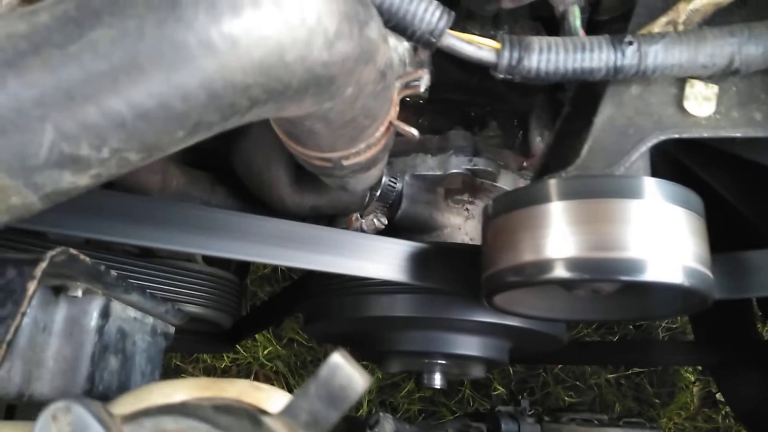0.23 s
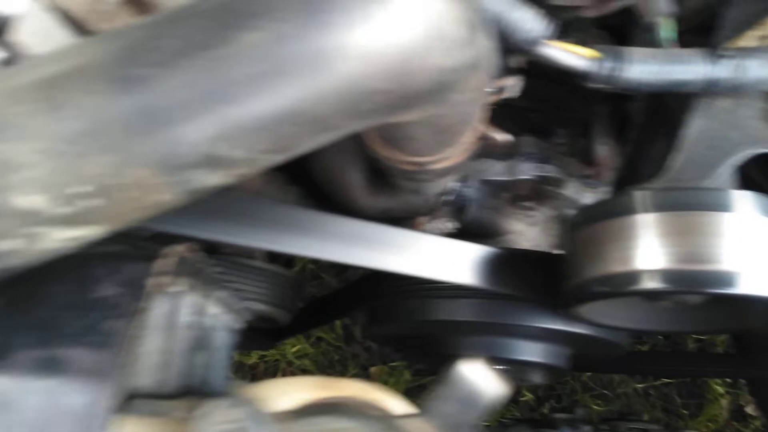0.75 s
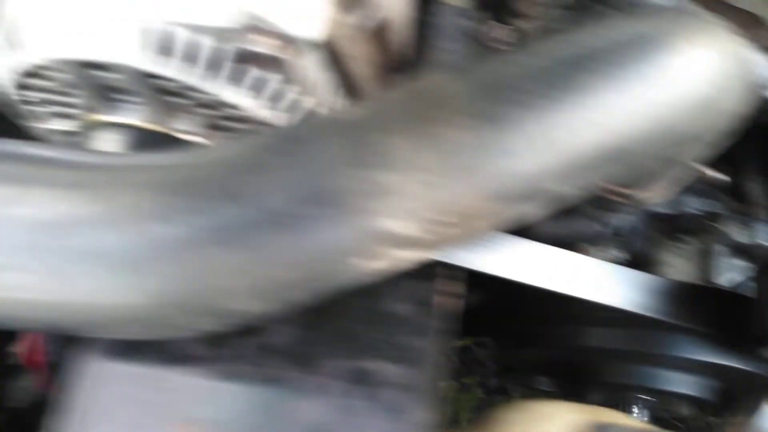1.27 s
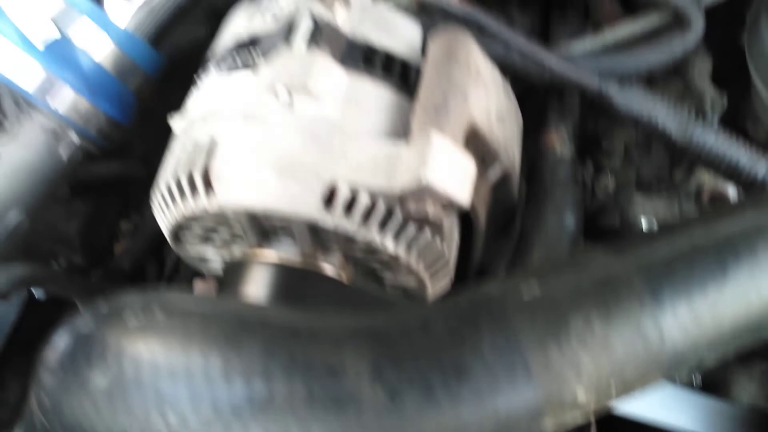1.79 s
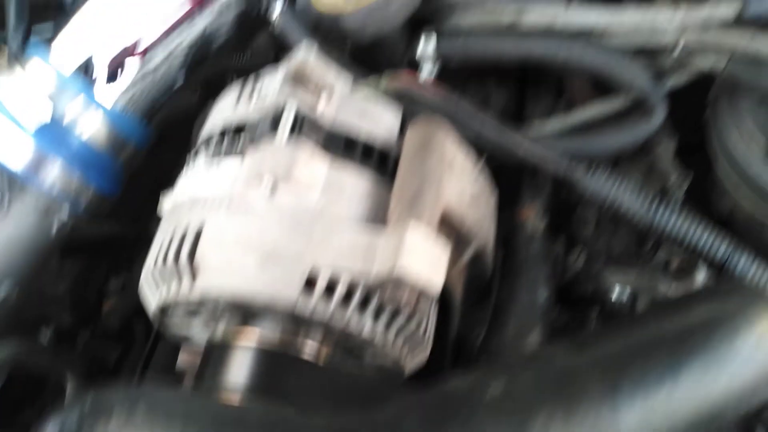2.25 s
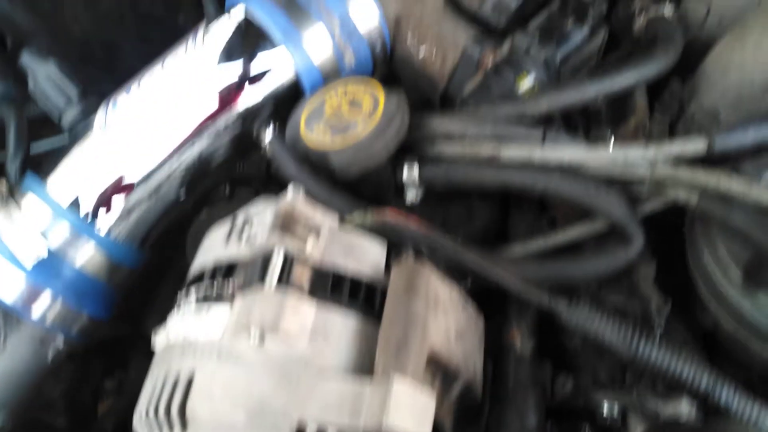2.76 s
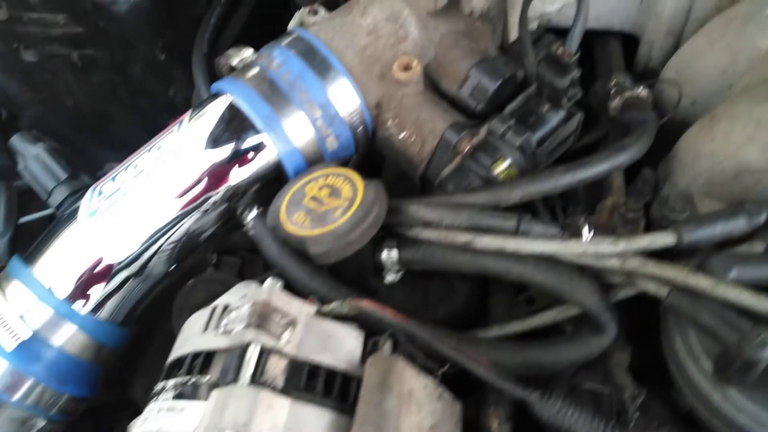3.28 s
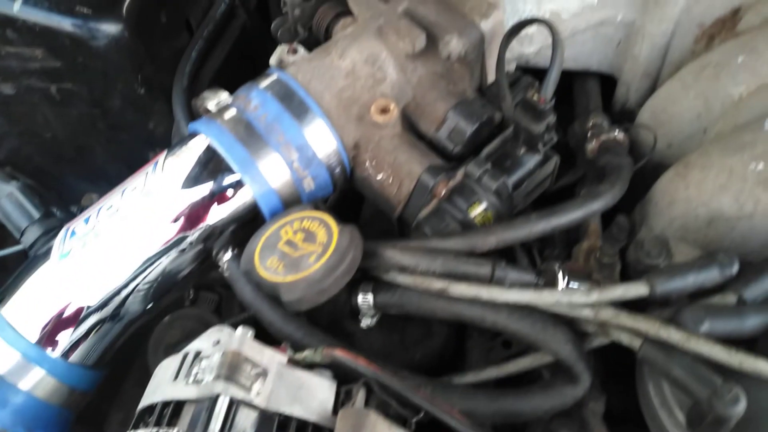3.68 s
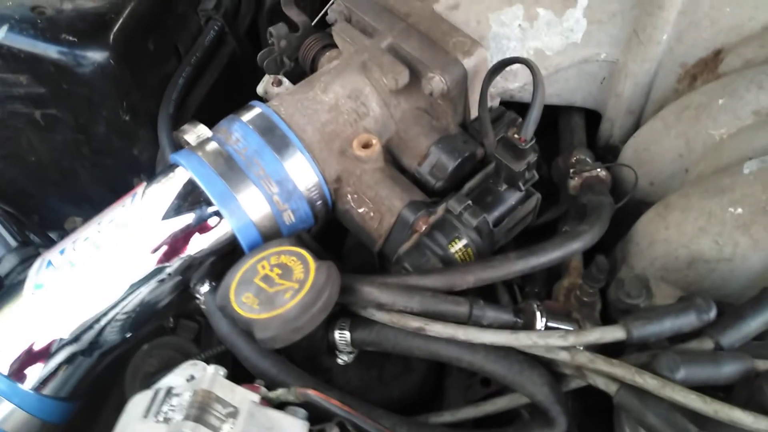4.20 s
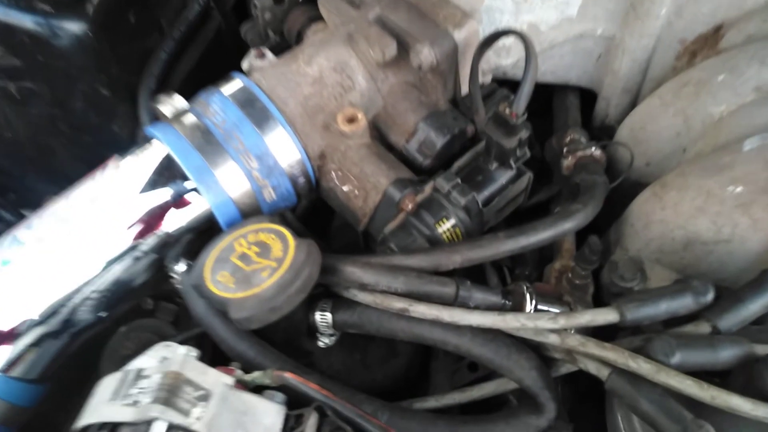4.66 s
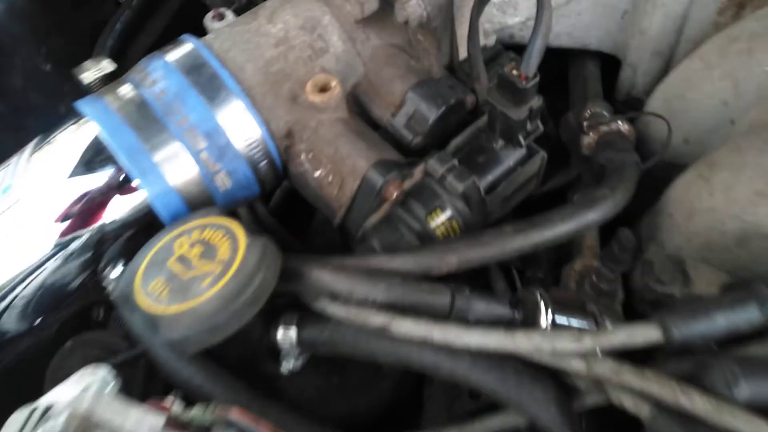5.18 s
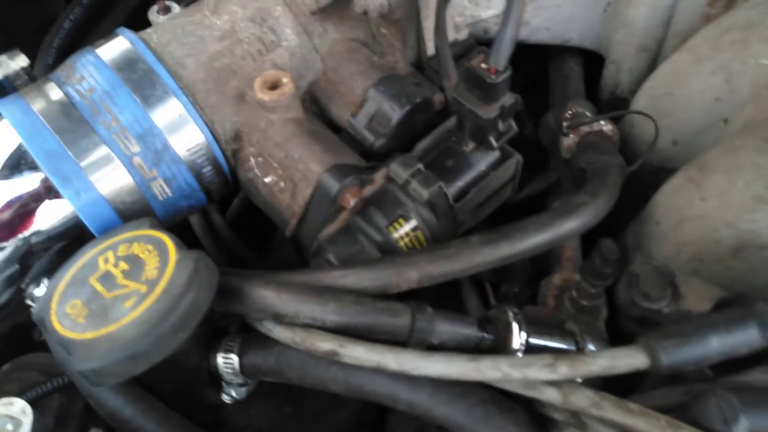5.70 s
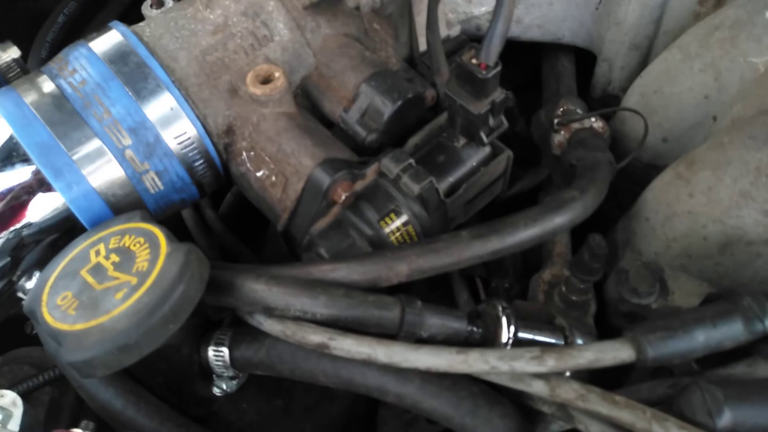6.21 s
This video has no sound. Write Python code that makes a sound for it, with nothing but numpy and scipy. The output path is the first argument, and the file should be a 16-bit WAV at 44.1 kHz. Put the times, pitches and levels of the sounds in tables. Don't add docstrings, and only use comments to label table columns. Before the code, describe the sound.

An eight-cylinder engine idles continuously, heard close in its open bay. Low block rumble and rapid firing knocks sit under belt roar, fan hiss, thin bearing whistles and clattering tappets. A deep intake hum, pulsing about sixteen times a second, swells loudest around one and a half, three and five seconds, then drops back. The handheld microphone moves from pulleys past the alternator to the throttle, where the hiss shifts in colour.

```python
import sys
import numpy as np
from scipy import signal
from scipy.io import wavfile
from scipy.ndimage import uniform_filter1d

SR = 44100
rng = np.random.default_rng(int(sys.argv[2]) if len(sys.argv) > 2 else 0)


def to_wav(sig):
    pcm = np.clip(np.atleast_2d(sig), -1, 1) * 32767
    pcm = np.round(pcm).astype(np.int16)
    wavfile.write(sys.argv[1], SR, pcm.T)


def invert_db(x):
    u = np.asarray(x, float) / 20
    return 10 ** u


N = 284004
T = np.arange(N) / SR

# time_s, crank_turns_per_s
CRANK_SPEED = [(0.0, 16.16), (0.3, 16.4), (0.7, 16.66), (1.1, 15.79), (1.5, 15.96), (1.85, 16.12),
               (2.1, 16.85), (2.45, 16.21), (2.85, 16.27), (3.25, 15.83), (3.6, 16.2), (3.95, 17.04),
               (4.25, 17.0), (4.6, 16.38), (4.95, 15.79), (5.35, 16.48), (5.85, 16.04), (6.44, 16.11)]
# time_s, place (0 pulleys, 1 alternator, 2 throttle)
MIC_PLACE = [
    (0, 0.082),
    (0.85, 0.11),
    (1.45, 0.58),
    (3.0, 0.94),
    (3.7, 2.0),
    (6.44, 2.1),
]


def evened(x):
    return x / np.sqrt(np.mean(x ** 2) + 1e-20)


def curve(rows, t):
    rows = np.array(rows)
    return np.interp(t, rows[:, 0], rows[:, 1])


def read(points, hz):
    f, value = np.transpose(points)
    return np.interp(np.log(hz + 1), np.log(f + 1), value)


def add(mix, s, sound):
    at = round(s * SR) - len(sound) // 2 + np.arange(len(sound))
    inside = (at >= 0) & (at < N)
    mix[at[inside]] += sound[inside]


def resonate(x, hz, width):
    turn = np.exp(2j * np.pi * np.cumsum(hz * np.ones(len(x))) / SR)
    r = np.exp(-np.pi * width / SR)
    return 2 * (turn * signal.lfilter([1 - r], [1, -r], x * turn.conj())).real


def nearness(t, place):
    return np.clip(1 - abs(curve(MIC_PLACE, t) - place), 0, 1)


def level(place_db, share):
    # time_s, closeness_db
    closeness = [
        (0, -1),
        (.3, 0.7),
        (1.6, 0),
        (1.96, 0.96),
        (3.5, -0.8),
        (3.93, 0.83),
        (4.9, -0.5),
        (5.7, 0.56),
        (6.44, -0.6),
    ]
    return invert_db(np.interp(curve(MIC_PLACE, T), np.arange(3), place_db) + share * curve(closeness, T))


def hiss(colours, patchy_db, size):
    hop = size // 4
    frames, hz = N // hop + 5, np.fft.rfftfreq(size, 1 / SR)
    t = np.arange(frames) * hop / SR
    a, b, patches, combs = rng.standard_normal((frames, len(hz), 4)).T
    combs = evened(uniform_filter1d(uniform_filter1d(combs, 2, 0), 70, 1))
    patches = evened(uniform_filter1d(uniform_filter1d(patches, 7, 0), 12, 1))
    gusts = evened(uniform_filter1d(rng.standard_normal(frames), 3))
    if len(colours) > 1:
        shares = [nearness(t, k) for k in range(len(colours))]
    else:
        shares = [np.ones(frames)]
    gain = invert_db(sum(np.outer(read(c, hz), s) for c, s in zip(colours, shares)))
    gain /= np.sqrt((gain ** 2).sum(0))
    z = (a + 1j * b) * gain * invert_db(patchy_db * patches + 1.9 * combs + 0.42 * gusts)
    return evened(signal.istft(z, nperseg=size, noverlap=size - hop)[1][:N])


def beat(turns, depth):
    return evened(1 + depth * np.exp(-(turns % 1) / 0.15))


def gulps(turns):
    # start_s, boom_peak_db
    valve = [(0, -24.5), (.66, -16), (.91, -22), (1.04, -11), (1.4, -4.5), (1.65, -13.5), (1.97, -25),
             (2.89, -5.5), (3.44, -11.5), (3.69, -19.5), (3.81, -26), (4.59, -13), (4.89, -7), (5.27, -16),
             (5.39, -24.5), (5.64, -14), (6.07, -21), (6.38, -16)]
    # time_s, over_valve_db
    odd_gulps = [(.21, 4.5), (.39, -6), (.69, 5.5), (.75, 0), (.88, 4.5), (.94, 2), (1.07, -4), (1.13, 2.5),
                 (1.25, -6), (1.38, 0.5), (1.62, -3), (1.88, 1.5), (2.83, -9), (2.92, -5.5), (3.1, 2.5),
                 (3.47, -1), (3.54, 8.5), (3.66, 3.5), (3.72, -1), (3.78, 6.5), (4.56, -1), (4.61, -3),
                 (4.92, 5), (5.11, 5.5), (5.17, -4.5), (5.24, 2.5), (5.73, -3.5), (5.98, 9.5), (6.1, -16)]
    booms, swell, t = np.zeros(N), np.zeros(N), np.arange(-3500, 3501) / SR
    turn = np.arange(int(turns[-1]) + 1)
    times, odd_even = np.interp(turn, turns, T), (-1.) ** turn
    opened, held_db = np.transpose(valve)
    valve_db = held_db[np.maximum(np.searchsorted(opened, times) - 1, 0)]
    shut = valve_db < -18
    chance = rng.standard_normal((len(turn), 4)) * np.where(shut, 2.1, 1)[:, None]
    gulp_db = 0.88 * chance[:, 0] - 0.5 * odd_even * shut
    for s, db in odd_gulps:
        gulp_db[abs(times - s).argmin()] = db

    stretch = -0.03 * gulp_db + 0.0023 * (valve_db + 6) + 0.13 * odd_even + 0.1 * chance[:, 1]
    halves_s = 0.048 * np.exp(stretch)
    lates_s = 0.0019 + 0.00078 * odd_even + 0.00014 * (valve_db + 13) + 0.0013 * chance[:, 2]
    pitches_hz = 7.38 * curve(CRANK_SPEED, times) + 0.18 * (valve_db + 10) + 1.0 * chance[:, 3]
    builds = 1.386 * np.exp(-0.04 * np.maximum(np.diff(valve_db, prepend=0), 0))

    for s, db, hz, half, late, build in zip(times, valve_db + gulp_db, pitches_hz, halves_s, lates_s, builds):
        length = half * np.where(t < late, build, 0.92)
        shape = invert_db(db) * np.cos(np.pi / 2 * np.clip((t - late) / length, -1, 1)) ** 2
        shape *= 0.9 + 0.24 * np.exp(-((t - late) / 0.011) ** 2)
        add(booms, s, shape * np.cos(2 * np.pi * hz * t))
        add(swell, s, shape)
    return booms, uniform_filter1d(swell, 3500)


def valve_slaps():
    # time_s, peak_db, pitch_hz
    slaps = [(0.2, -51, 190), (0.689, -31, 218), (0.882, -31, 201), (1.07, -30, 198), (1.899, -33, 190),
             (2.937, -21, 186), (3.1, -25.5, 200), (3.543, -20, 192), (4.918, -26, 196), (5.11, -22, 200),
             (5.243, -24, 220), (5.975, -20, 207)]
    out, t = np.zeros(N), np.arange(-3500, 3501) / SR
    for s, db, hz in slaps:
        add(out, s, invert_db(db) * np.exp(-(t / 0.0049) ** 2) * np.cos(2 * np.pi * hz * t))
    return out


def intake(turns):
    # multiple_of_crank_speed, under_hum_db
    hum_orders = [(2, -39), (3, -32), (4, -25), (5, -33.5), (10, -37.5), (11, -35), (12, -37),
                  (14.2, -35.5), (19, -42)]
    booms, swell = gulps(turns)
    out = booms + valve_slaps()
    tones = sum(invert_db(db) * np.cos(2 * np.pi * (k * turns + rng.random())) for k, db in hum_orders)
    tones += invert_db(-19.5) * np.cos(2 * np.pi * 6 * turns)
    rush = evened(resonate(rng.standard_normal(N), 40, 100))
    return out + 0.0061 * out ** 2 + swell * (tones + invert_db(-33.5) * rush)


def ring(knocks, modes):
    return sum(invert_db(db) * resonate(resonate(knocks, hz, width), hz, 3 * width) for hz, width, db in modes)


def firing_knocks(turns):
    # pitch_hz, width_hz, level_db
    block_modes = [(322, 51, 0.5), (369.3, 38, 3.5), (423.7, 26.5, 4), (494, 42, 1), (700, 85, -3)]
    # pitch_hz, width_hz, level_db
    sump_modes = [(521, 20, 2.5), (549, 50, 0)]
    fired = np.diff(np.floor(4 * turns), prepend=0) > 0
    bank = (-1.) ** np.cumsum(fired)
    knocks = fired * (bank + 0.5) * invert_db(0.85 * rng.standard_normal(N))
    rung = ring(knocks, block_modes)
    rung += nearness(T, 0) * ring(knocks + 0.69 * abs(knocks), sump_modes)
    return level((-49, -44.5, -44.5), share=1.4) * evened(rung)


def block_rumble(turns):
    # frequency_hz, density_db_per_hz
    rumble_colour = [(12, -53), (20, -34), (54, -11.5), (90, -22), (119, 9.5), (155, -37), (195, -20),
                     (257, -31), (368, -22), (537, -31), (698, -25.5), (822, -51), (1000, -32), (1300, -60),
                     (2200, -120)]
    rumble = level((-34, -32.5, -33.5), share=1.9) * hiss([rumble_colour], patchy_db=3.0, size=2048)
    rumble -= 0.85 * resonate(rumble, 118, 90)
    return rumble * beat(4 * turns, depth=0.38) * beat(2 * turns, depth=0.11)


def belt(turns):
    # frequency_hz, density_db_per_hz
    belt_colours = [
        [(470, -41), (800, -9), (894, 4), (1010, -27), (1100, -6), (1180, -5), (2100, -11), (2510, -5),
         (3500, -9.5), (4550, -31), (7700, -120)],
        [(470, -42), (800, -12), (889, -1), (1230, -9.5), (1470, 0), (1690, -5.5), (1970, -8), (2200, -5),
         (3500, -9.5), (4550, 4), (7700, -120)],
        [(470, -11), (800, -4), (900, -4), (1120, -11.5), (1260, -7), (1360, 0), (1830, -5.5), (2480, -4),
         (3500, -6), (4550, -22), (7700, -120)],
    ]
    # pitch_hz, width_hz, level_db, place
    brackets = [(1099, 25, -53.5, 0.36), (1455, 50, -54.5, 0.11), (3730, 230, -58, 0.25),
                (703, 54, -51.5, 0.85), (700, 36, -52.5, 2.46), (2687, 25, -53.5, 0.73),
                (7530, 66, -53, 1.5), (1500, 180, -69.5, 1.05), (2344, 79, -47.5, 1.65),
                (6700, 250, -69, 0.72), (4460, 190, -62, 0.85), (4570, 130, -45, 2.27),
                (1793, 92, -45, 2.74), (2780, 13, -50.5, 2.24), (6790, 58, -48, 2), (1500, 67, -48.5, 1.46),
                (1114, 33, -54.5, 2)]
    # pitch_hz, width_hz, level_db, place
    more_brackets = [(10130, 140, -56, 1.6), (8570, 140, -52, 0.91), (4690, 110, -49, 0.16)]
    roar = level((-44.5, -42.5, -43), share=2.7) * hiss(belt_colours, patchy_db=1.06, size=1024)
    shake = rng.standard_normal(N)
    for hz, width, db, place in list(brackets) + list(more_brackets):
        rung = evened(resonate(resonate(shake, hz, width), hz, 2 * width))
        roar += invert_db(db) * nearness(T, place) * rung
    roar *= beat(8.3 * turns, depth=1.0)
    return roar * beat(turns + 0.3, depth=0.52) * beat(turns / 2 + 0.6, depth=0.25)


def pulley_bearings(turns):
    # pitch_hz, waver_hz, level_db, drift_hz_per_s
    whistles = [(2455, 20, -49.5, 110), (2765, 14, -51, 0), (4705, 28, -45, 0)]
    out = np.zeros(N)
    for hz, waver_hz, db, drift in whistles:
        waver = uniform_filter1d(uniform_filter1d(rng.standard_normal(N), size=300), size=300)
        pitch_hz = hz + drift * T + waver_hz * evened(waver)
        out += invert_db(db + 4) * np.cos(2 * np.pi * np.cumsum(pitch_hz) / SR)
    return nearness(T, 0) * out * beat(8.3 * turns, depth=0.51)


def alternator():
    # multiple_of_crank_speed, level_db, place
    whines = [(115.8, -48.5, 1.4), (125.2, -50.5, 0.91), (101.8, -52.5, 1.9), (111.2, -53, 2.05)]
    shake, speed, out = rng.standard_normal(N), curve(CRANK_SPEED, T), np.zeros(N)
    for k, db, place in whines:
        out += invert_db(db) * nearness(T, place) ** 0.5 * evened(resonate(shake, k * speed, 25))
    return out


def fan_air(turns):
    # frequency_hz, density_db_per_hz
    air_colours = [
        [(1650, -24), (2800, -15), (3220, -10.5), (3920, -4.5), (4210, -3), (4600, -1), (4980, -0.5),
         (7720, -8), (8240, -12), (9460, -12.5), (10900, -21), (12000, -20.5), (16000, -27)],
        [(1650, -81), (2800, -7), (3010, -6), (4630, 4), (5810, 4.5), (6290, -1), (6920, 3), (8240, -8),
         (8860, -7), (10300, -11.5), (10900, -18), (12700, -12.5), (16000, -23)],
        [(1650, -14), (2800, -16.5), (2970, -10.5), (4030, -3.5), (4560, 0), (5680, 2.5), (6200, -5),
         (6770, -5.5), (7330, -6), (8550, -8.5), (10800, -17.5), (13100, -19), (16000, -26)],
    ]
    out = level((-35, -34.5, -34), share=0.91) * hiss(air_colours, patchy_db=1.0, size=1024)
    out *= beat(8.45 * turns, depth=0.45)
    return out * beat(turns, depth=0.37) * beat(turns / 2 + 0.25, depth=0.028)


def valves(turns):
    tapped = np.diff(np.floor(8 * turns + 0.25 * np.sin(2 * np.pi * turns)), prepend=0) > 0
    taps = tapped * invert_db(-37.0 + 5.6 * np.clip(rng.standard_normal(N), -3, 1.7))
    cover, t, out = rng.integers(0, 3, N), np.arange(400) / SR, np.zeros(N)
    for k, (hz, db) in enumerate([(5500, 0.5), (7200, -6), (9200, -11)]):
        tap = resonate(rng.standard_normal(400) * t * np.exp(-t / 0.001), hz, 1300)
        out += invert_db(db) * signal.oaconvolve(taps * (cover == k), tap / abs(tap).max())[:N]
    return out


def injectors(turns):
    injector_db = [-10, -2, 2, -7, 4, -17, 1, 2.5]
    # time_s, peak_db
    near_clicks = [(0.0598, -44), (0.0757, -33), (0.1979, -37), (0.3052, -41), (0.3197, -37), (0.4409, -36),
                   (0.5467, -49), (0.5631, -38), (0.6873, -38), (0.7901, -44), (0.9128, -46), (1.6038, -42),
                   (1.6232, -42), (1.6661, -42), (1.8083, -40), (1.8517, -46), (2.0941, -41), (2.2139, -40),
                   (2.3526, -40), (2.4129, -48), (2.4563, -47), (2.58, -43.5), (2.7077, -38), (2.9058, -37),
                   (3.5149, -44), (5.2116, -39), (5.7643, -41), (5.8257, -42), (6.2003, -36), (6.3869, -42)]
    firing = np.floor(4 * turns + 0.085).astype(int)
    click_db = -48 + np.take(injector_db, firing, mode="wrap") + 3.1 * rng.standard_normal(N)
    clicks = (np.diff(firing, prepend=0) > 0) * invert_db(click_db)
    for s, db in near_clicks:
        add(clicks, s, invert_db([db + 0.5]))
    t = np.arange(600) / SR
    rattle = rng.standard_normal(600) * t * np.exp(-t / 0.0029)
    click = resonate(resonate(rattle, 11800, 1500), 11800, 2500) + 0.27 * resonate(rattle, 5800, 2500)
    return signal.oaconvolve(clicks, click / abs(click).max())[:N]


def air_puffs():
    # middle_s, level_db, centre_hz, width_hz, half_length_s
    puffs = [(1.775, -45, 2250, 900, 0.052), (1.905, -41, 2480, 895, 0.037),
             (2.111, -36.5, 8040, 1600, 0.011), (2.355, -33, 6500, 1500, 0.015),
             (2.76, -43, 1500, 500, 0.024), (3.34, -33, 6340, 1400, .012), (2.016, -34, 5500, 1200, .015),
             (2.607, -51, 435, 80, 0.13), (4.247, -45, 208, 50, 0.044), (3.948, -47, 1500, 500, .05),
             (4.829, -29.5, 6200, 3000, 0.0088), (4.959, -34, 2160, 600, 0.0099),
             (4.96, -33.5, 6400, 2000, 0.029), (5.04, -34, 5400, 900, 0.011), (5.187, -34, 2200, 700, 0.01),
             (5.301, -42, 1500, 500, 0.031), (5.601, -33, 5400, 1300, 0.045),
             (5.698, -43, 2200, 600, 0.017), (5.755, -36, 1800, 600, 0.015), (5.87, -33, 6000, 900, 0.0078),
             (6.178, -35.5, 5300, 1300, 0.13), (6.3, -42, 1880, 400, 0.034)]
    out, t = np.zeros(N), np.arange(-6000, 6001) / SR
    for s, db, hz, width, half in puffs:
        puff = evened(resonate(resonate(rng.standard_normal(len(t)), hz, width), hz, width))
        add(out, s, invert_db(db) * puff * np.exp(-(t / half) ** 2))
    return out


def scene():
    turns = np.cumsum(curve(CRANK_SPEED, T)) / SR
    knock_turns = 1.009 * turns
    mix = intake(turns - 0.355)
    mix += firing_knocks(knock_turns) + block_rumble(knock_turns)
    mix += belt(turns) + pulley_bearings(turns) + alternator()
    mix += fan_air(turns) + valves(turns) + injectors(turns) + air_puffs()
    return mix[None]


def roll_off(x):
    return signal.sosfilt(signal.butter(12, 16510, fs=SR, output="sos"), x)


def record(dry):
    power = uniform_filter1d(uniform_filter1d(dry[0] ** 2, size=187), size=374)
    power_db = 10 * np.log10(abs(power) + 1e-12)
    fall_db = T * 60.
    over_db = np.maximum(np.maximum.accumulate(power_db + fall_db) - fall_db + 9.5, 0)
    ducked = dry / invert_db(0.64 * uniform_filter1d(over_db, 300))
    edge = signal.firwin(1023, 15690, window=("kaiser", 9), fs=SR)
    return roll_off(signal.oaconvolve(ducked, edge[None], "same"))


dry = scene()
out = record(dry)
to_wav(out)
```